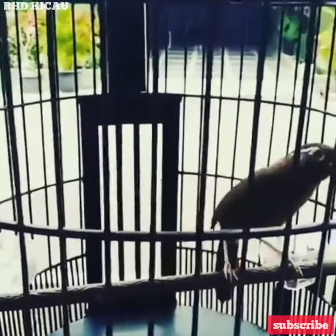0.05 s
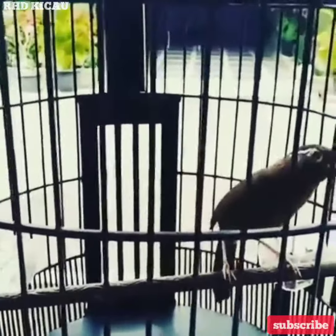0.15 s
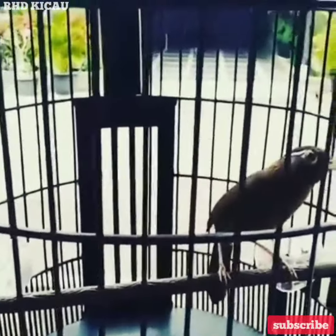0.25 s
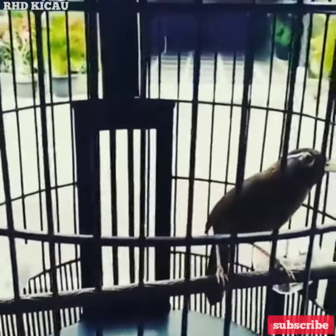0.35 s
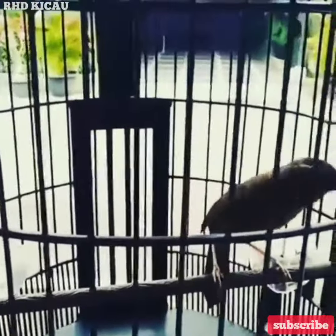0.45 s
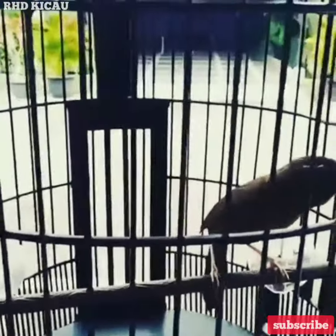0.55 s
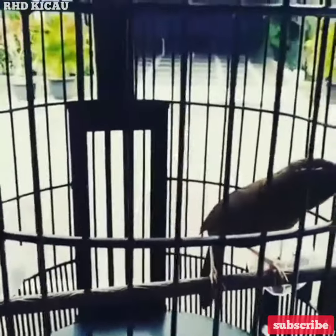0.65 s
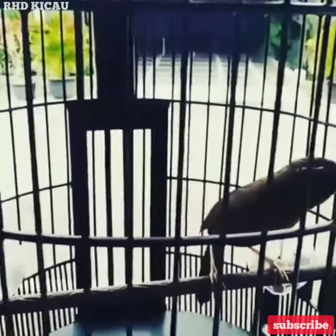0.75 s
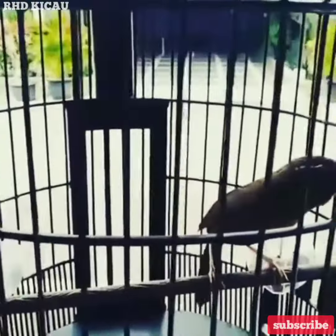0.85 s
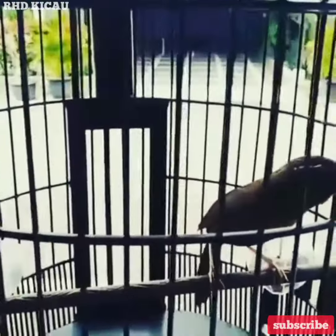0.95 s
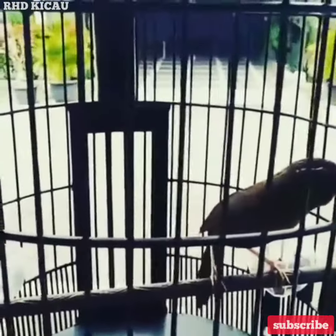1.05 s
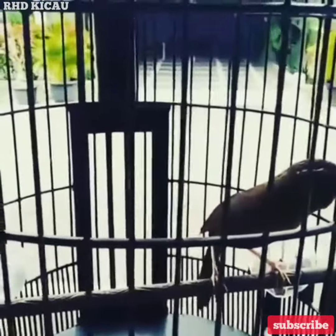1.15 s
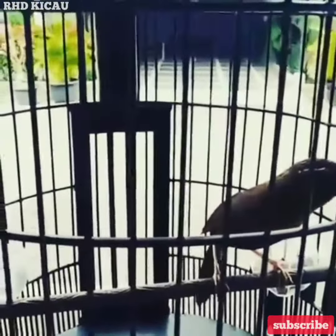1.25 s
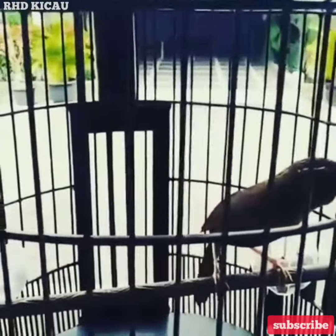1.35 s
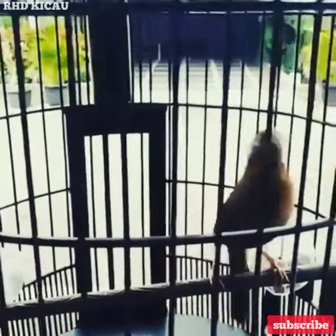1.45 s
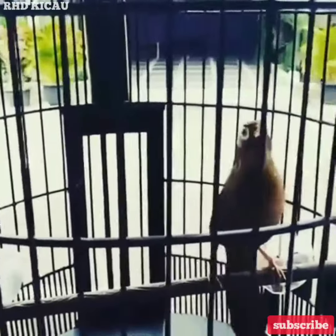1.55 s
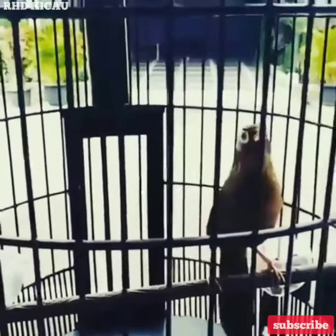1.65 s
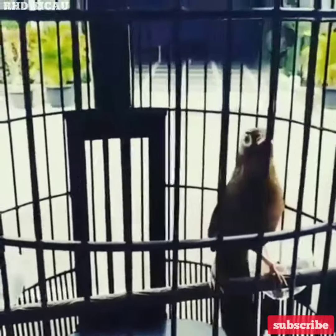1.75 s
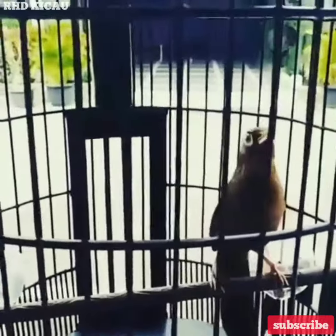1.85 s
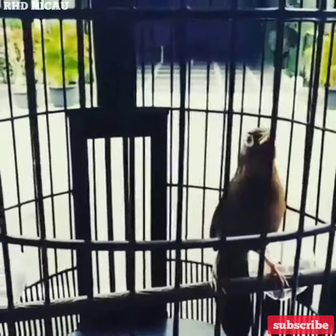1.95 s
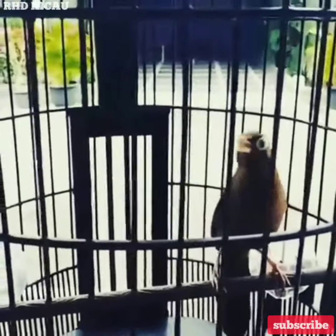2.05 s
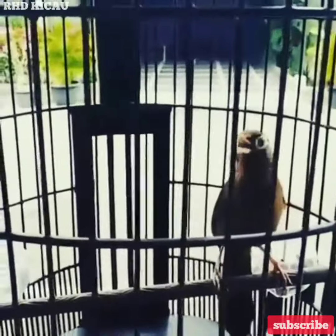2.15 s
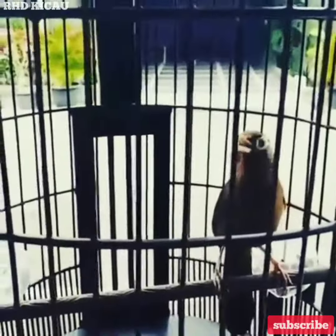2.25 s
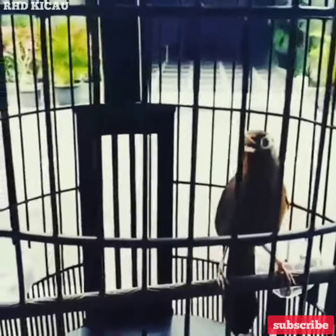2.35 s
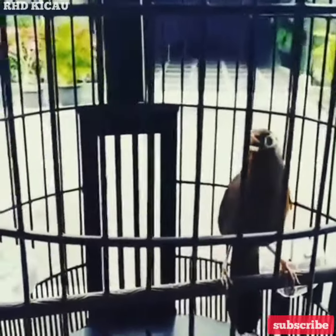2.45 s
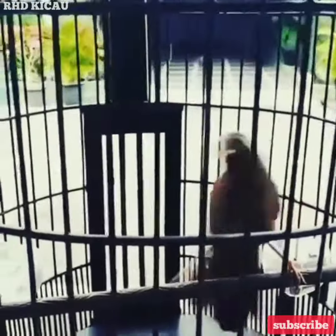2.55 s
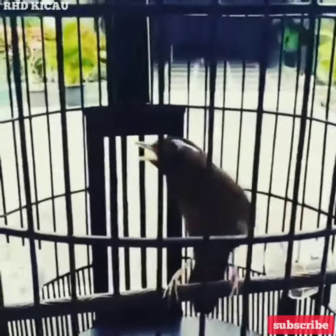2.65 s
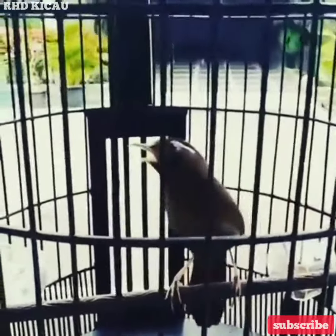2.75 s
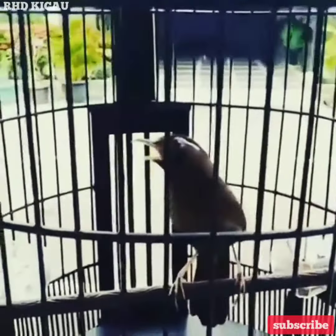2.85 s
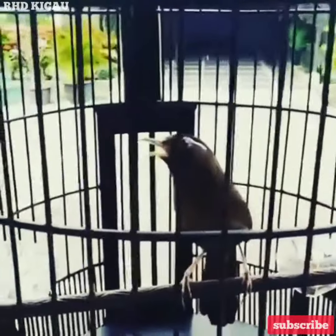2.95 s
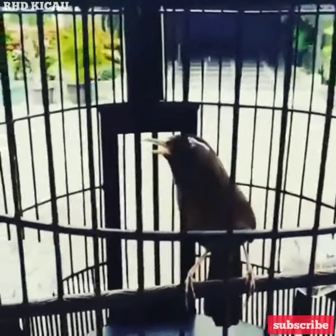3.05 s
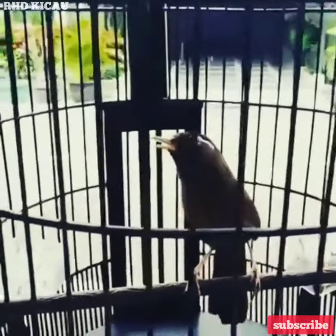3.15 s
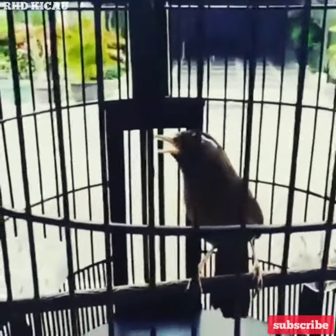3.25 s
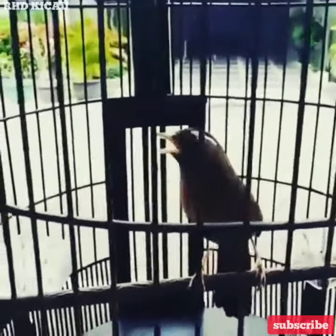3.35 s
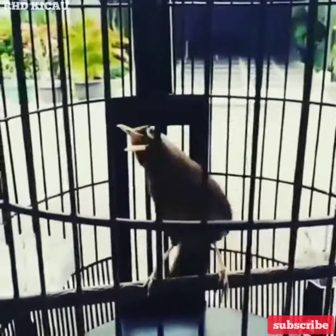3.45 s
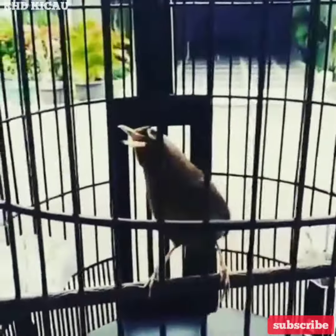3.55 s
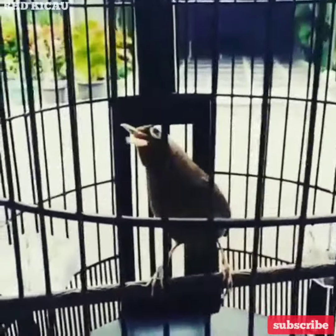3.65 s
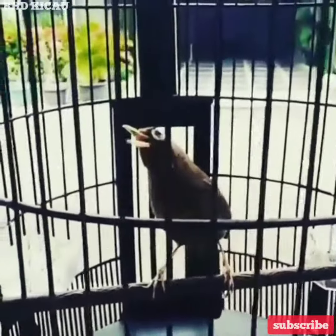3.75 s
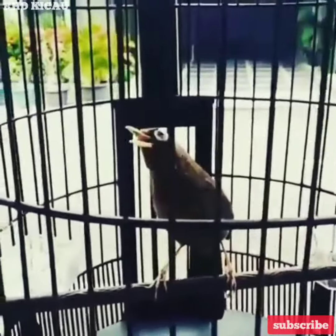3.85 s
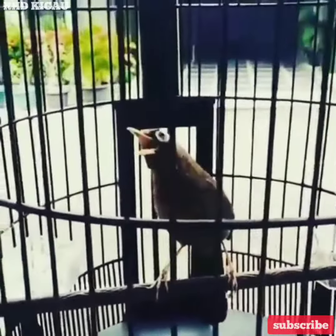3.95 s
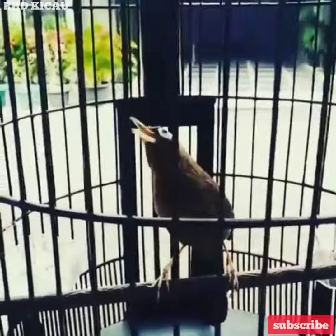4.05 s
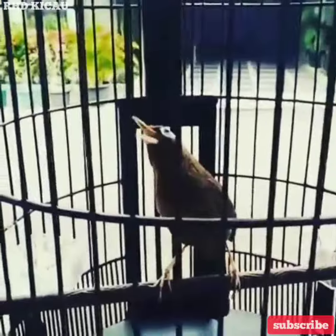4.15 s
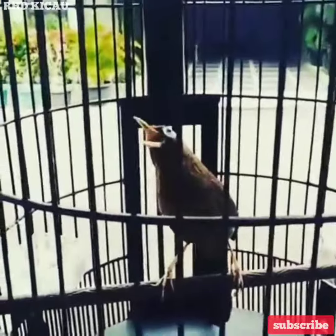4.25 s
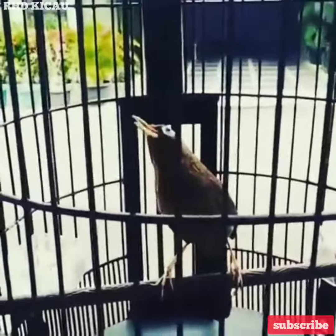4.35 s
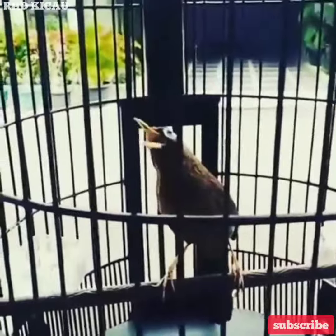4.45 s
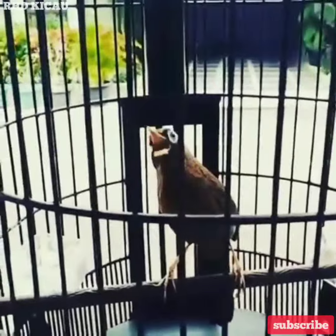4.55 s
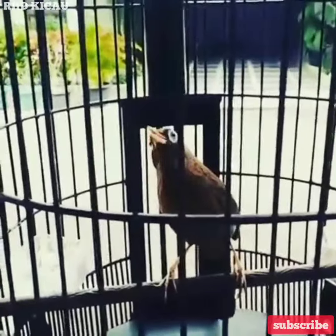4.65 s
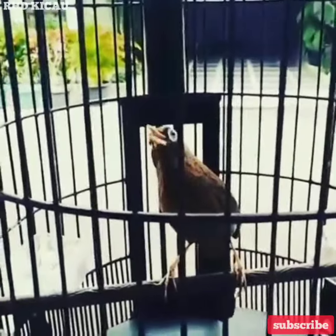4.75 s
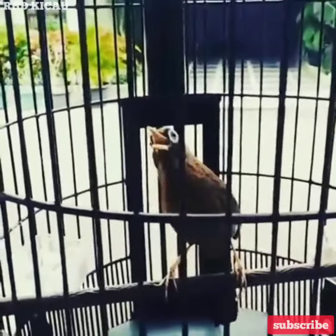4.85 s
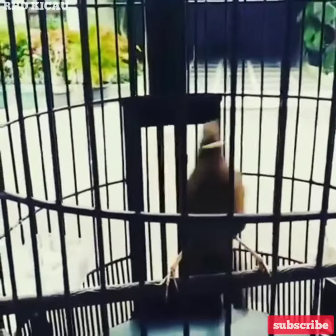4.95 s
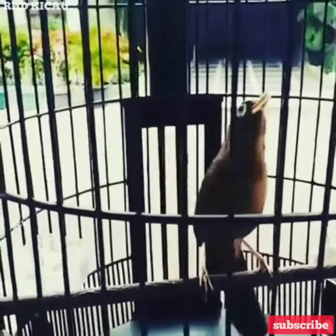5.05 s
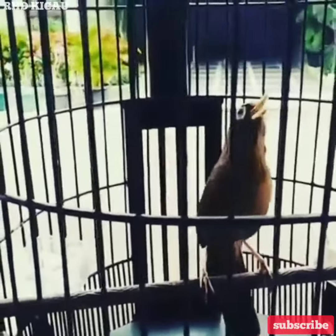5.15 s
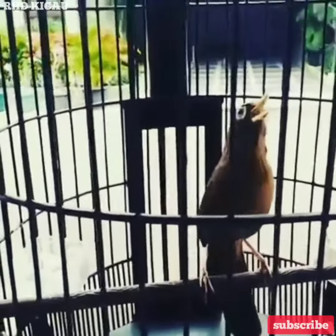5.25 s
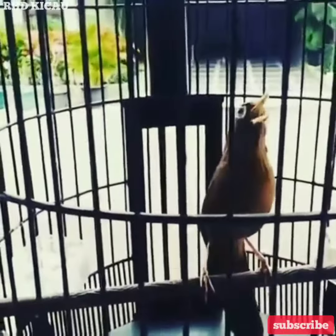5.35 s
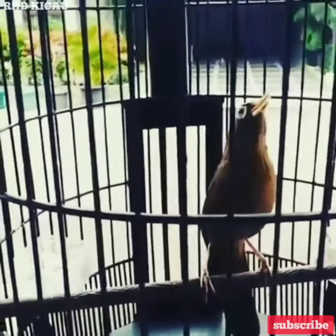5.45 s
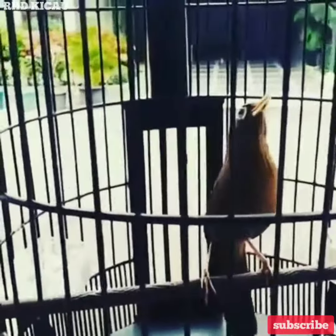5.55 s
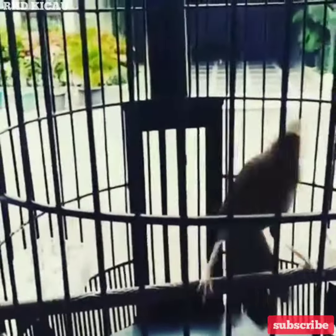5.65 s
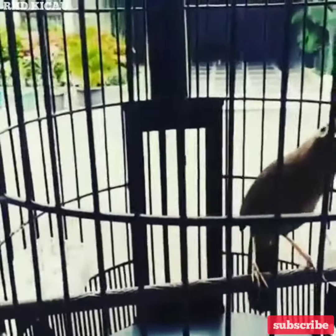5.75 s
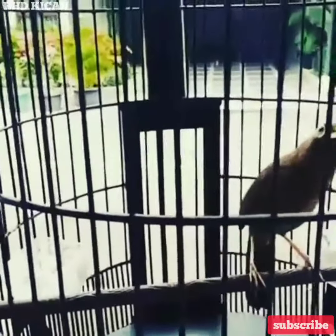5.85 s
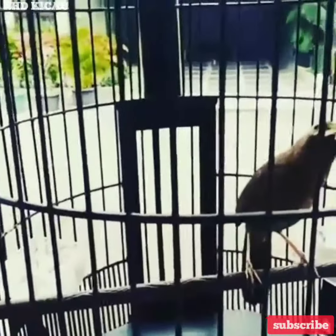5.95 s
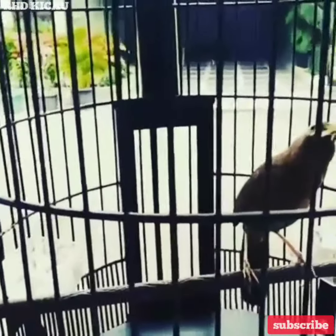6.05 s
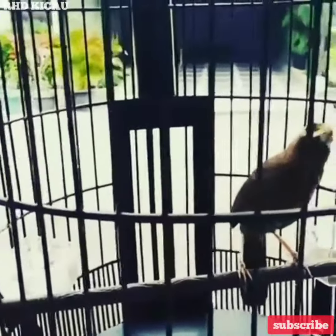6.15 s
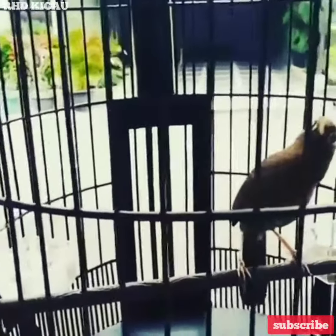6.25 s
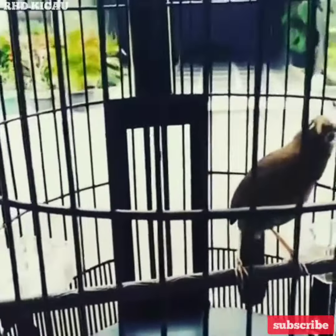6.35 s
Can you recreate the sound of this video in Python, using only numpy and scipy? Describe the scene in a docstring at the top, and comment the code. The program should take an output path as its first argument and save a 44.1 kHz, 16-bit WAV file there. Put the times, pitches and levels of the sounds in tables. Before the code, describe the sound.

On a quiet, slightly echoing porch, a songbird in a cage whistles five clear arching notes nearby, over the faint hoarse calls of a far bird. It launches into a rapid trill with a buzz in the middle, then three high slurs and two fluttering upward whistles. Its hops on the perch are barely audible, and low wind bumps the microphone at the end.

```python
"""Under a porch roof a caged songbird sings close by: five arched whistles, a fast trill broken by a buzz,
three high slurs, two long rising whistles. Membranes in its syrinx make the tone and its flutter;
throat and beak shape the overtones; cage, walls and roof reflect them. Farther off another bird gives
wheezy falling calls. The singer hops on its perch twice; at the end a gust buffets the microphone."""
import sys
import numpy as np
from scipy import signal
from scipy.fft import rfft, irfft, next_fast_len
from scipy.io import wavfile
from scipy.ndimage import uniform_filter1d, minimum_filter1d

SR = 44100
rng = np.random.default_rng(int(sys.argv[2]) if len(sys.argv) > 2 else 0)


def generate_wav(sig):
    """Save sig (samples, or channels by samples) to the path in sys.argv[1] as 16-bit PCM at SR."""
    pcm = np.round(np.clip(np.atleast_2d(sig).T, -1, 1) * 32767).astype(np.int16)
    wavfile.write(sys.argv[1], SR, pcm)


N = 282681
TIME_S = np.arange(N) / SR

# Noise spectra. Each row: frequency in Hz, relative level in dB.
AIR_SPECTRUM = [(20, -11.5), (60, 0.5), (150, -8.5), (300, -16), (800, -10.5), (2000, -19.5), (2900, -20),
                (4500, -34), (9000, -26.5), (13000, -37)]
GUST_SPECTRUM = [(20, -28.5), (35, -10.5), (50, -4.5), (70, 4), (110, -3.5), (170, -10.5), (300, -28),
                 (500, -39.5), (1000, -64.5), (2500, -95)]
BUFFET_SPECTRUM = [(20, -43), (70, 2), (160, -2), (300, -5.5), (600, -15.5), (1100, -32), (2500, -96)]
PERCH_SPECTRUM = [(100, -4), (400, -4), (700, 11), (1000, -24), (1500, 6), (2500, -12.5), (4500, -22),
                  (7000, -7), (10000, 1.5), (13000, -10)]
CRACKLE_SPECTRUM = [(20, -1.5), (80, -3.5), (200, -2.5), (500, -4), (1200, -5), (2500, -5), (4500, -24.5),
                    (13000, -31)]
RASP_SPECTRUM = [(3000, -42), (4800, -11.5), (6200, -14.5), (7600, -6), (8800, 0.5), (10300, -6.5),
                 (11500, -5.5), (13000, -9.5)]
# Near reflections. Each row: delay in seconds, gain.
WALL_ECHOES = [(.0019, 0.062), (.0043, -0.19), (.0071, .11), (0.0084, .09), (0.0135, -0.1)]
# Porch reverberation. Each row: frequency in Hz, T60 in seconds.
PORCH_DECAY = [(300, 0.58), (1300, .55), (2000, 0.51), (3000, 0.4), (5000, 0.4), (10000, 0.33),
               (13000, 0.098)]
# Wind swells. Each row: peak time in seconds, half-width in seconds, level in dB.
WIND_GUSTS = [(4.0, 0.095, -56), (5.132, 0.2, -51), (5.96, 0.064, -40.5), (6.14, 0.096, -27),
              (6.42, 0.11, -21.5)]
# Sharp wind hits. Each row: start in seconds, level in dB.
WIND_BUFFETS = [(6.088, -44), (6.263, -27.5), (6.348, -31), (6.377, -21.5)]
# Far bird's calls. Each row: start in seconds, length in seconds, level in dB.
FAR_CALLS = [(0.096, 0.54, -39.5), (0.709, 0.51, -37), (1.223, .5, -36), (1.727, 0.47, -35.5),
             (6.342, 0.7, -39)]
# Its harmonics 1 to 3. Each row: relative level in dB, spread in Hz.
FAR_HARMONICS = [(-5, 228), (-33, 1100), (-23.5, 1100)]
# Hops on the perch. Each row: start in seconds, level in dB.
PERCH_HOPS = [(.112, -53.5), (5.878, -53.5)]
# Overtone response of throat and open beak. Each row: frequency in Hz, gain in dB.
TRACT_RESPONSE = [(3500, -30.5), (4700, -33.5), (5600, -38.5), (7000, -40), (8400, -26), (9400, -24.5),
                  (10300, -20), (11700, -25), (12800, -27.5)]
# The beak opens for higher syllables. Each row: turn pitch in Hz, brightness in dB.
BEAK_BRIGHTNESS = [(2450, -6.5), (2540, 1.5), (2630, 2.5)]
# Arched whistles. Each row: leap time in seconds, lead-in pitch in Hz, top pitch in Hz,
# length after the leap in seconds, level in dB, dip at the top in dB.
ARCH_NOTES = [(.727, 1560, 2146, .13, -12.5, -18), (1.024, 1330, 2178, .13, -9.5, -20),
              (1.295, 1330, 2107, 0.14, -8.3, -11), (1.586, 1310, 2100, .128, -9, -8),
              (1.876, 1360, 2190, 0.14, -10.3, -1.5)]
# Trill. Each row: start in seconds, length in seconds, turn pitch in Hz, level in dB.
TRILL_SYLLABLES = [(2.284, 0.08, 2793, -14), (2.378, 0.069, 2460, -13), (2.478, 0.073, 2458, -12.5),
                   (2.574, 0.073, 2437, -11), (2.674, 0.072, 2473, -12.5), (2.776, 0.071, 2520, -10.5),
                   (2.886, 0.064, 2523, -10), (2.991, 0.066, 2600, -10), (3.098, .062, 2533, -8.5),
                   (3.465, 0.078, 2636, -12.5), (3.568, 0.068, 2530, -12), (3.674, 0.068, 2562, -11),
                   (3.781, 0.074, 2627, -10), (3.897, 0.063, 2600, -10), (4.004, .067, 2591, -9.5),
                   (4.115, 0.059, 2690, -11)]
# Breakpoints of the buzz. Each row: time in seconds, pitch in Hz, level in dB.
BUZZ_CONTOUR = [(3.219, 2690, -21), (3.229, 2500, -16.5), (3.238, 2050, -17), (3.265, 2013, -17),
                (3.305, 2437, -12), (3.352, 2132, -18), (3.402, 1640, -29.5)]
# High slurs. Each row: start in seconds, delays to the step and to the break in seconds,
# high and low pitch in Hz, level in dB, relative onset level in dB.
SLUR_NOTES = [(4.161, 0.021, 0.11, 3676, 3347, -10.5, -1), (4.382, 0.035, 0.14, 4070, 3197, -10.5, -11),
              (4.634, .038, .151, 3964, 3297, -11, -11)]
# Rising whistles. Each row: start in seconds, length in seconds, delay to the second climb in seconds,
# level in dB, flutter depth in Hz.
RISE_NOTES = [(4.92, .313, .2, -7, 169), (5.343, .281, .188, -7.8, 216)]

RELEASE_DB = -12


def gain_of(db):
    """Decibels to amplitude."""
    return 10 ** (np.asarray(db) / 20)


def unit_rms(x):
    """Scales to rms 1."""
    return x / np.sqrt(np.mean(x ** 2) + 1e-20)


def lookup(table, hz):
    """Interpolates a table over log frequency."""
    table_hz, value = np.transpose(table)
    return np.interp(np.log(hz + 1), np.log(table_hz + 1), value)


def add(mix, start_s, sound):
    """Mixes a sound in at start_s."""
    part = mix[..., max(round(start_s * SR), 0):][..., :sound.shape[-1]]
    part += sound[..., :part.shape[-1]]


def noise(spectrum, n=N):
    """Steady coloured noise, rms 1."""
    size = next_fast_len(n, True)
    colour = gain_of(lookup(spectrum, np.fft.rfftfreq(size, 1 / SR)))
    return unit_rms(irfft(rfft(rng.standard_normal(size)) * colour, size)[:n])


def wander(n, hz):
    """Smooth random motion up to about hz."""
    size = next_fast_len(max(n, SR // 4), True)
    lowpass = np.exp(-.5 * (np.fft.rfftfreq(size, 1 / SR) / hz) ** 2)
    return unit_rms(irfft(rfft(rng.standard_normal(size)) * lowpass, size))[:n]


def ramp(t, length_s):
    """0 to 1 in length_s, then holds."""
    return np.clip(t / length_s, 0, 1)


def fades(n, attack_s, release_s):
    """Soft-edged envelope of n samples."""
    t = TIME_S[:n]
    return np.sin(np.pi / 2 * ramp(t, attack_s) * ramp(t[::-1], release_s)) ** 2


def bursts(rows, spectrum, rise_s, decay_s):
    """Short bursts of coloured noise."""
    envelope, t = np.zeros(N), TIME_S[:SR // 2]
    shape = (1 - np.exp(-t / rise_s)) * np.exp(-t / decay_s)
    for start_s, db in rows:
        add(envelope, start_s, gain_of(db) * shape / shape.max())
    return envelope * noise(spectrum)


def smear(x, t60_s, taps_per_s=2000):
    """Blurs a sound in time with a decaying spray of random taps."""
    t = TIME_S[:SR // 8]
    spray = rng.standard_normal(len(t)) * (rng.random(len(t)) < taps_per_s / SR)
    spray *= gain_of(-60 * t / t60_s)
    return signal.fftconvolve(x, spray / np.linalg.norm(spray))[:N]


def air():
    """Quiet outdoor air."""
    return gain_of(-70.5) * noise(AIR_SPECTRUM)


def porch(x, build_s=.0007):
    """Diffuse tail; each band decays at its own rate."""
    hz, t, bands = signal.stft(rng.standard_normal(SR), SR, nperseg=256)
    bands = bands * gain_of(-60 * t / lookup(PORCH_DECAY, hz)[:, None])
    tail = signal.istft(bands, SR, nperseg=256)[1][:SR]
    tail *= 1 - np.exp(-TIME_S[:SR] / build_s)
    return signal.fftconvolve(x, tail / np.linalg.norm(tail))[:N]


def near_walls(x):
    """Direct sound plus single echoes off cage floor and walls; they ripple a gliding tone."""
    out = x.copy()
    for delay_s, gain in WALL_ECHOES:
        add(out, delay_s, gain * x)
    return out


def wind():
    """Low turbulence at the microphone: swells and a few sharper buffets."""
    swell = sum(gain_of(db) * np.exp(-((TIME_S - at_s) / width_s) ** 2)
                for at_s, width_s, db in WIND_GUSTS)
    gusts = swell * noise(GUST_SPECTRUM)
    return gusts + bursts(WIND_BUFFETS, BUFFET_SPECTRUM, rise_s=.0023, decay_s=.017)


def far_bird(start_hz=3577, end_hz=2720, peak_share=.42):
    """Hoarse falling calls: irregular flutter smears each harmonic into a band."""
    out = np.zeros(N)
    for start_s, length_s, db in FAR_CALLS:
        n = int(length_s * SR)
        phase = 2 * np.pi * np.cumsum(np.linspace(start_hz, end_hz, n)) / SR
        swell = gain_of(db - 78 * (np.linspace(0, 1, n) - peak_share) ** 2)
        swell *= fades(n, attack_s=.057, release_s=.086)
        for k, (harmonic_db, spread_hz) in enumerate(FAR_HARMONICS, start=1):
            hoarse = wander(n, spread_hz) + 1j * wander(n, spread_hz)
            add(out, start_s, swell * gain_of(harmonic_db) * (hoarse * np.exp(1j * k * phase)).real)
    return out + gain_of(-3.5) * porch(out)


def perch_hops():
    """Soft knocks as the singer lands on its perch."""
    return bursts(PERCH_HOPS, PERCH_SPECTRUM, rise_s=.005, decay_s=.042)


def crackle(song):
    """Faint uneven crackle riding on loud, rasping notes."""
    tone_rms, overtone_rms = np.sqrt(abs(uniform_filter1d(song ** 2, size=200, axis=1)))
    grit = unit_rms(gain_of(5.3 * wander(N, hz=110)))
    return gain_of(-31.5) * np.sqrt(tone_rms * overtone_rms) * grit * noise(CRACKLE_SPECTRUM)


def syrinx(centre_hz, swing_hz, db, bright_db, rasp_db, even_db, jitter, throat_hz):
    """One note from the membranes, as two rows: fundamental, overtones with rasp."""
    n = len(db)
    hz = (centre_hz + swing_hz) * (1 + jitter * wander(n, hz=300))
    phase, centre_phase = 2 * np.pi * np.cumsum([hz, centre_hz], axis=1) / SR
    # The throat tracks the centre pitch and trims far flutter sidebands.
    throat = signal.butter(3, throat_hz, fs=SR, output="sos")
    baseband = signal.sosfiltfilt(throat, np.exp(1j * (phase - centre_phase)))
    tone = (baseband * np.exp(1j * centre_phase)).imag
    # Period doubling sets in at both ends of the range.
    subharmonic_db = np.interp(centre_hz, [2100, 2500, 3550, 3570], [-47, -51, -50.5, -33])
    tone += gain_of(subharmonic_db) * np.sin(phase / 2)
    overtones = gain_of(rasp_db) * noise(RASP_SPECTRUM, n)
    for k in range(2, 8):
        flicker_db = 3 * wander(n, hz=90)
        overtone_db = lookup(TRACT_RESPONSE, k * hz) + even_db * (k % 2 == 0) + flicker_db
        overtones += gain_of(overtone_db) * (k * hz < SR / 3) * np.sin(k * phase)
    overtones *= gain_of(bright_db + .17 * (db - db.max()))  # louder is brighter
    return gain_of(db) * fades(n, attack_s=.0074, release_s=.0082) * np.array([tone, overtones])


def flutter(db, depth_hz, rate_hz, uneven, dip_db):
    """Membranes flick the pitch up and let it sink; the level ripples in step. Returns swing, level."""
    cycles = np.cumsum(rate_hz * (1 + uneven * wander(len(db), hz=60))) / SR
    angle = 2 * np.pi * (cycles - .37)
    swing_hz = depth_hz * (np.sin(angle) + .25 * np.sin(2 * angle))
    return swing_hz, db - dip_db * depth_hz / depth_hz.max() * np.cos(angle - .6)


def fluttered(contours, rate_hz, dip_db, **voice):
    """Sings contours of time, pitch, level and flutter depth."""
    out = np.zeros((2, N))
    for t, hz, db, depth_hz in contours:
        swing_hz, db = flutter(db, depth_hz, rate_hz, uneven=.14, dip_db=dip_db)
        add(out, t[0], syrinx(hz, swing_hz, db, **voice))
    return out


def beak(song, cutoff_hz):
    """The half-open beak holds back the highest overtones."""
    tone, overtones = song
    lowpass = signal.butter(8, cutoff_hz, fs=SR, output="sos")
    return np.array([tone, signal.sosfilt(lowpass, overtones)])


def arches(lead_s=.048, leap_s=.009, sink_s=.066, rest_hz=1684.4):
    """Pure low whistles: soft lead-in, leap to the top, fading sink to a resting pitch."""
    attack_s, hold_s, dip_at_s, dip_width_s = .012, .051, .028, .012
    sag_hz_per_s, swell_db_per_s, fade_db_per_s = 710, 198.5, 137
    out = np.zeros((2, N))
    for leap_at_s, lead_hz, top_hz, length_s, level_db, dip_db in ARCH_NOTES:
        t = np.arange(-lead_s, length_s, 1 / SR)
        before_s, after_s = np.maximum(-t, 0), np.maximum(t, 0)
        aim_hz = rest_hz + (top_hz - rest_hz) * np.exp(-(after_s / sink_s) ** 3)
        hz = aim_hz + (lead_hz - aim_hz) * np.exp(-after_s / leap_s) + sag_hz_per_s * before_s
        db = level_db - 16.5 * (1 - ramp(t, attack_s)) - swell_db_per_s * before_s
        db += dip_db * np.exp(-((t - dip_at_s) / dip_width_s) ** 2)
        db -= fade_db_per_s * np.maximum(t - hold_s, 0)
        note = syrinx(hz, 0, db, bright_db=-7.5, rasp_db=-29, even_db=-6, jitter=.012, throat_hz=300)
        add(out, leap_at_s - lead_s, note)
    return beak(out, cutoff_hz=12300)


def syllable_contour(length_s, turn_hz, level_db):
    """Swells on a clean fall, turns, climbs in flicks. Times and slopes stretch to fit length_s."""
    nominal_s, turn_s, open_s, release_s = .064, .02, .0047, .016
    fall_hz_per_s, climb_hz_per_s, sag_db_per_s = 20000, 17000, 69.5
    t = np.linspace(0, nominal_s, int(length_s * SR))
    before_s, after_s = np.maximum(turn_s - t, 0), np.maximum(t - turn_s, 0)
    depth_hz = 526 * (1 - np.exp(-after_s / open_s))
    hz = turn_hz + fall_hz_per_s * before_s + climb_hz_per_s * after_s + .68 * depth_hz
    db = level_db - 6 * before_s / turn_s - sag_db_per_s * after_s
    db += RELEASE_DB * (1 - ramp(nominal_s - t, release_s))
    return hz, db, depth_hz


def trill(flutter_hz=116):
    """About ten syllables a second; each brightens as its flutter opens."""
    out = np.zeros((2, N))
    for start_s, length_s, turn_hz, level_db in TRILL_SYLLABLES:
        hz, db, depth_hz = syllable_contour(length_s, turn_hz, level_db)
        swing_hz, db = flutter(db, depth_hz, flutter_hz * (depth_hz > 0), uneven=.15, dip_db=4.5)
        bright_db = lookup(BEAK_BRIGHTNESS, turn_hz) + np.interp(depth_hz, [0, 500], [-7, 5.5])
        note = syrinx(hz, swing_hz, db, bright_db, rasp_db=-24.5, even_db=10, jitter=.02, throat_hz=844)
        add(out, start_s, note)
    return beak(out, cutoff_hz=11100)


def buzz_contour(start_depth_hz=138, end_depth_hz=372):
    """Falls, rises and falls with rounded corners while the flutter widens."""
    times_s, *columns = np.transpose(BUZZ_CONTOUR)
    t = np.arange(times_s.min(), times_s.max(), 1 / SR)
    hz, db = (uniform_filter1d(np.interp(t, times_s, column), size=180) for column in columns)
    return t, hz, db, np.linspace(start_depth_hz, end_depth_hz, len(t))


def slur_contour(start_s, step_at_s, break_at_s, high_hz, low_hz, level_db, onset_db):
    """Scoops up, steps down, curls up again, breaks into a falling flutter."""
    scoop_hz, scoop_s, step_s, curl_hz, curl_s = 445, .013, .028, 284, .012
    attack_s, break_s, fall_hz_per_s, fade_db_per_s = .034, .024, 17000, 400
    t = np.arange(0, break_at_s + break_s, 1 / SR)
    stepped_s, broken_s = np.maximum(t - step_at_s, 0), np.maximum(t - break_at_s, 0)
    hz = low_hz + (high_hz - low_hz) * np.exp(-(stepped_s / step_s) ** 1.5)
    hz -= scoop_hz * np.exp(-t / scoop_s)
    hz += curl_hz * np.exp(np.minimum(t - break_at_s, 0) / curl_s) - fall_hz_per_s * broken_s
    db = level_db + onset_db * (1 - ramp(t, attack_s)) - fade_db_per_s * broken_s
    depth_hz = 25.6 + 485 * ramp(broken_s, length_s=.0022)
    return start_s + t, hz, db, depth_hz


def rise_contour(start_s, length_s, climb_at_s, level_db, depth_hz):
    """Soft lead-in, fluttering slide to a calmer tilted plateau, second climb, final flick."""
    lead_s, lead_hz, slide_s, plateau_hz, tilt_hz_per_s = .015, 1580, .026, 2430, 550
    climb_hz, climb_s, flick_hz, flick_s = 290, .05, 257.6, .0044
    onset_db, swell_s, release_s, open_s, calm_s = -29, .031, .024, .02, .078
    t = np.arange(0, length_s, 1 / SR)
    after_s = np.maximum(t - lead_s, 0)
    hz = plateau_hz + (lead_hz - plateau_hz) * np.exp(-after_s / slide_s) + tilt_hz_per_s * after_s
    hz += climb_hz * (1 - np.exp(-(np.maximum(t - climb_at_s, 0) / climb_s) ** 2))
    hz += flick_hz * np.exp((t - length_s) / flick_s)
    db = level_db + onset_db * np.exp(-after_s / swell_s)
    db += RELEASE_DB * (1 - ramp(length_s - t, release_s))
    opening = ramp(after_s, open_s) * np.exp((open_s - after_s) / calm_s)
    return start_s + t, hz, db, depth_hz * opening


def fluttering_song():
    """The song after the arches: trill, buzz, slurs, rising whistles."""
    song = trill()
    song += fluttered([buzz_contour()], rate_hz=190, dip_db=5,
                      bright_db=-4, rasp_db=-49, even_db=5, jitter=.03, throat_hz=413)
    song += fluttered([slur_contour(*row) for row in SLUR_NOTES], rate_hz=120, dip_db=-1,
                      bright_db=16, rasp_db=-43, even_db=-1.5, jitter=.0076, throat_hz=700)
    song += fluttered([rise_contour(*row) for row in RISE_NOTES], rate_hz=190, dip_db=6,
                      bright_db=-3.5, rasp_db=-33.5, even_db=5, jitter=.0054, throat_hz=420)
    return song


def scene():
    """Stereo mix: all centred except a faint stereo shimmer on the highest overtones."""
    arched, fluttering = arches(), fluttering_song()
    song = arched + fluttering
    tone, overtones = song
    # The beak beams the centred treble away; it returns off bars and walls.
    treble = gain_of(-14.5) * fluttering[1] + gain_of(-1.5) * smear(fluttering[1], t60_s=.024)
    treble += smear(arched[1], t60_s=.074)  # the bird faces away for the arches: more smear
    hops = perch_hops()
    reverb = porch(gain_of(-11.5) * tone + gain_of(-7.5) * overtones + gain_of(-10) * hops)
    mid = near_walls(tone + hops) + treble + reverb + far_bird()
    mid += crackle(song) + wind() + air()
    shimmer = gain_of(-12) * smear(overtones, t60_s=.1)
    return np.array([mid + shimmer, mid - shimmer])


def record(dry):
    """Fast limiter on the loudest whistles, then a low-pass."""
    ceiling, window_samples, cutoff_hz = .76, 160, 13150
    peak = -minimum_filter1d(-abs(dry).max(0), window_samples)
    reduction = uniform_filter1d(np.maximum(peak / ceiling, 1), window_samples)
    lowpass = signal.firwin(401, cutoff_hz, window=("kaiser", 9), fs=SR)
    return signal.oaconvolve(dry / reduction, lowpass[None], "same", axes=1)


dry = scene()
out = record(dry)
generate_wav(out)
```